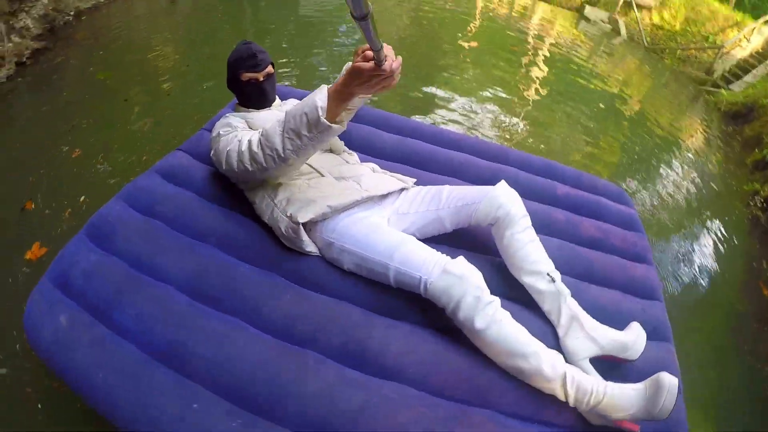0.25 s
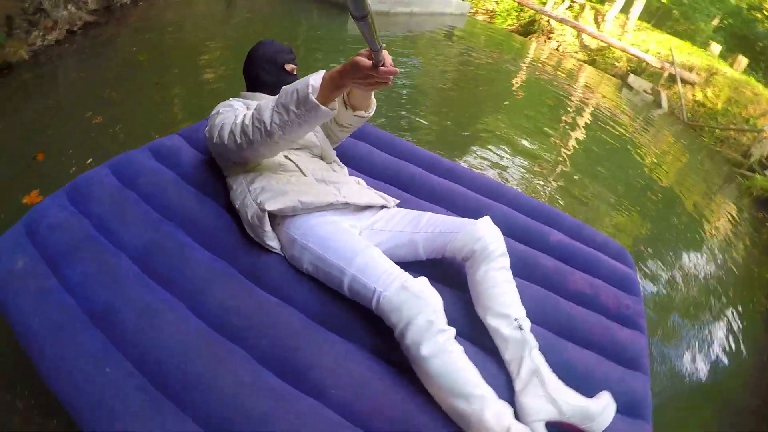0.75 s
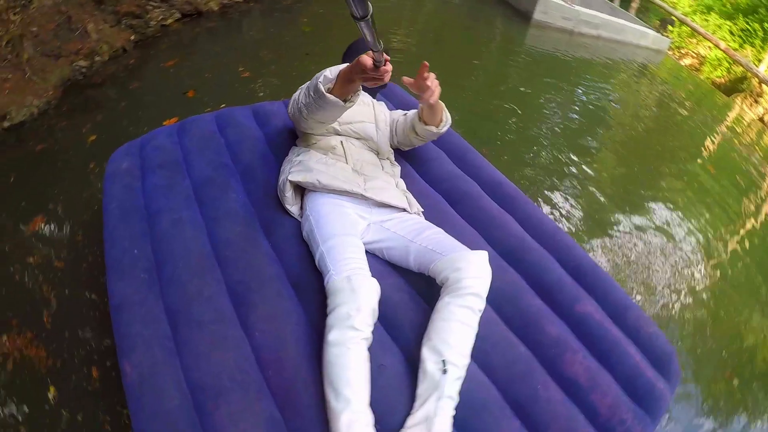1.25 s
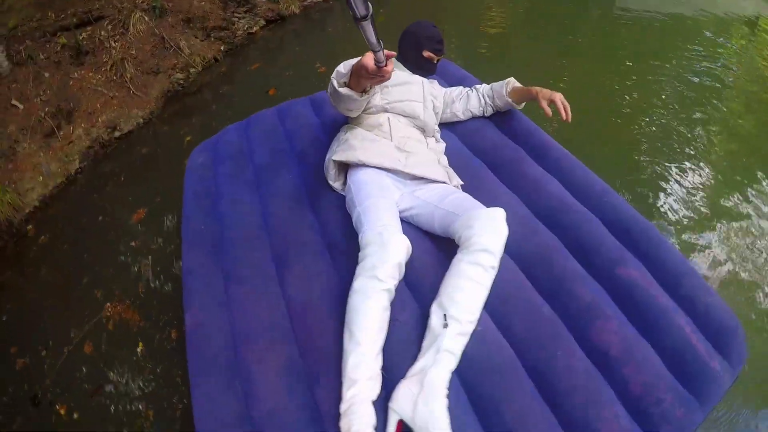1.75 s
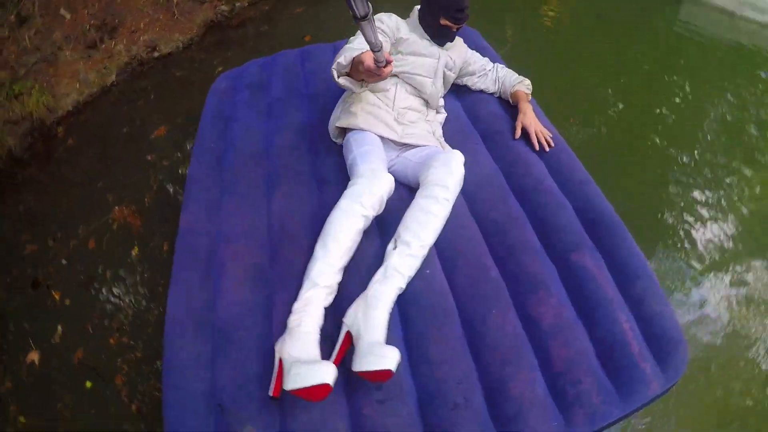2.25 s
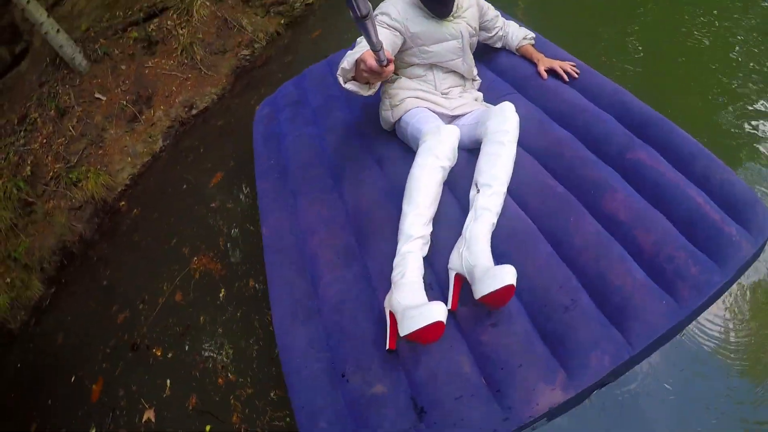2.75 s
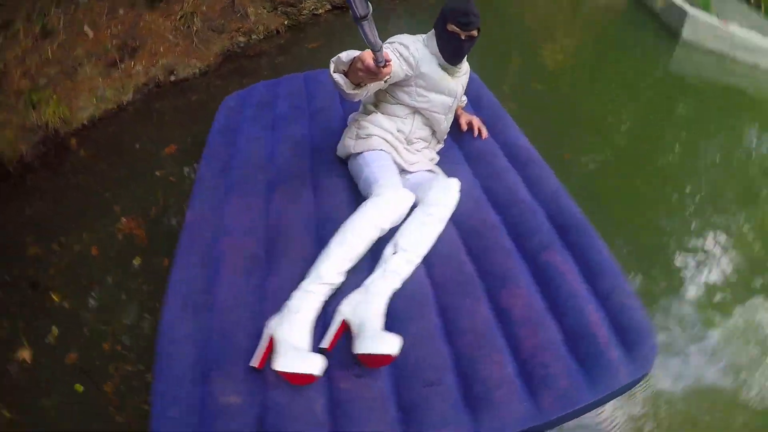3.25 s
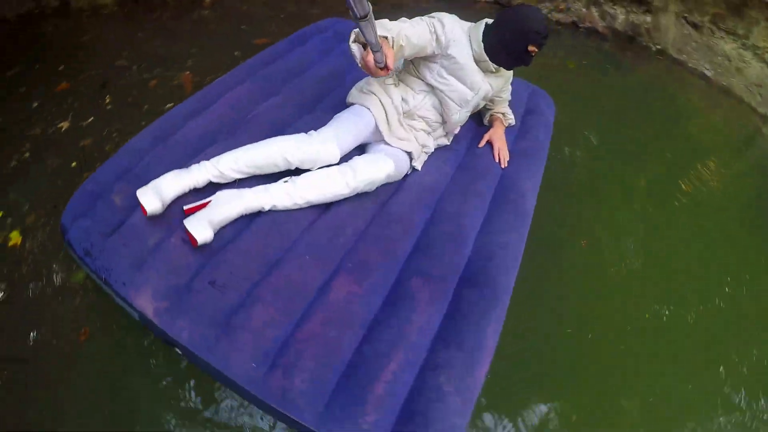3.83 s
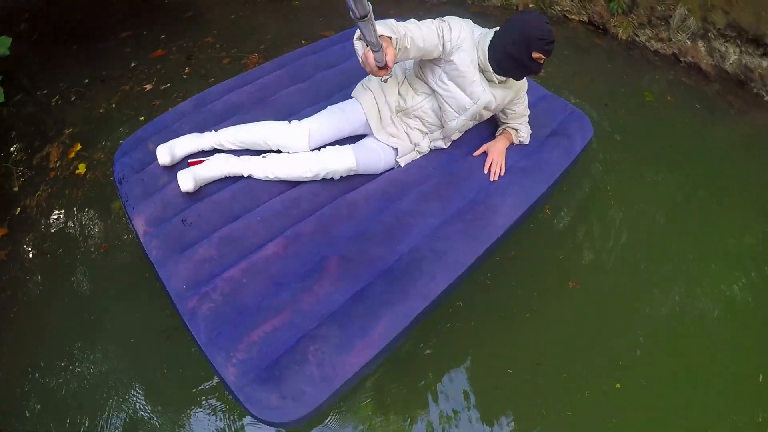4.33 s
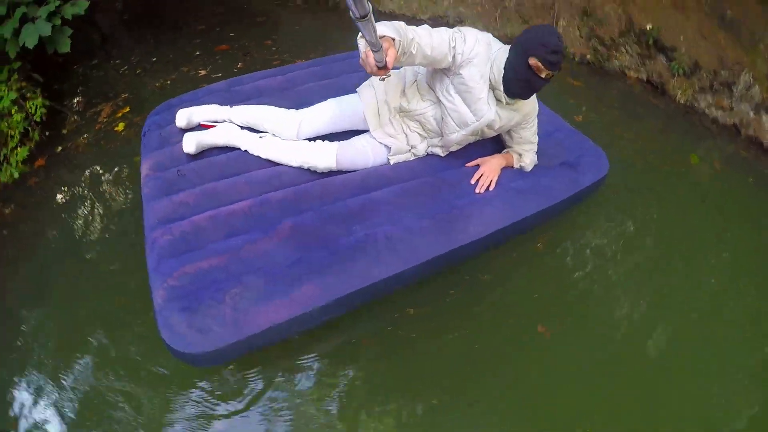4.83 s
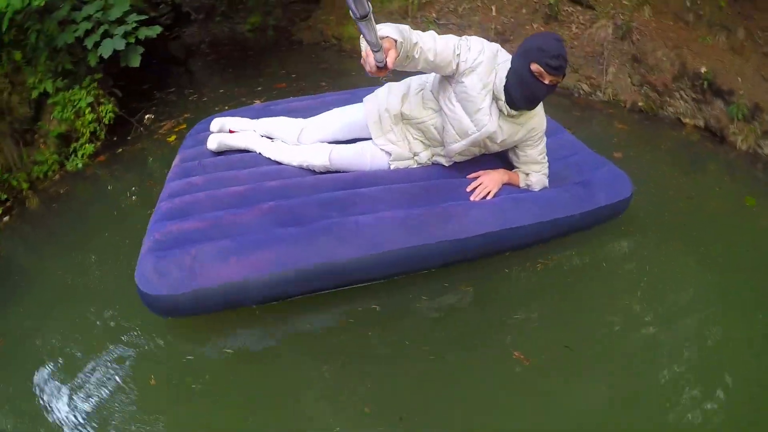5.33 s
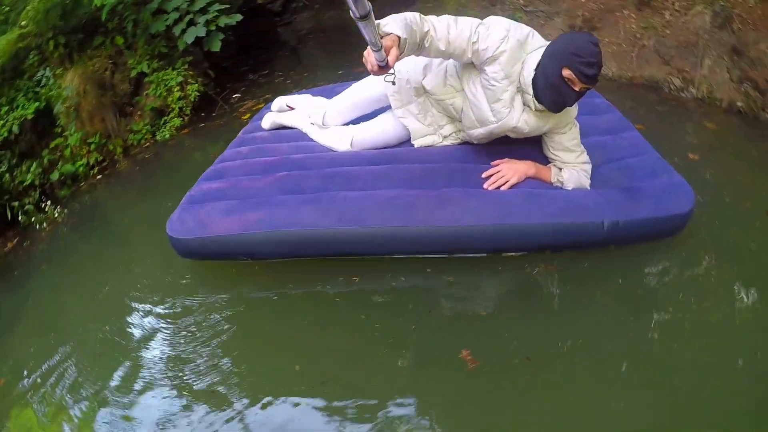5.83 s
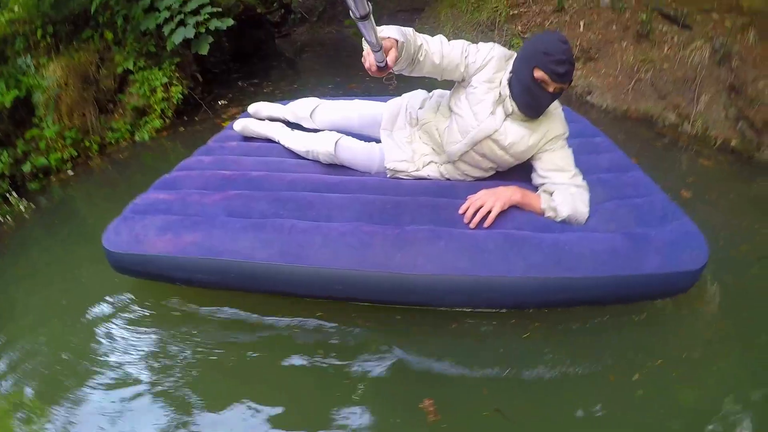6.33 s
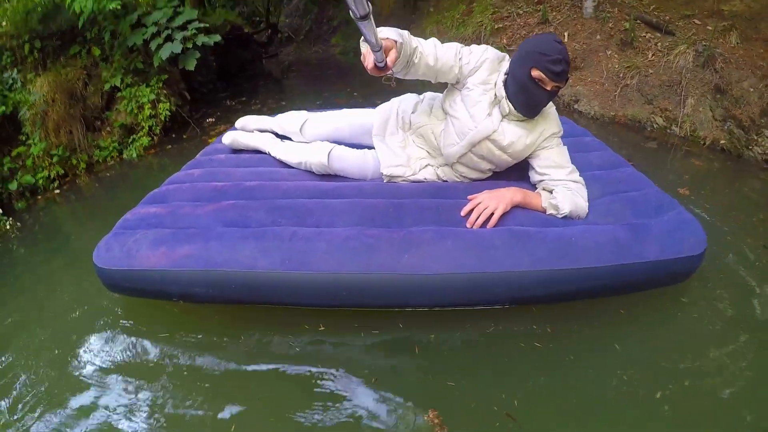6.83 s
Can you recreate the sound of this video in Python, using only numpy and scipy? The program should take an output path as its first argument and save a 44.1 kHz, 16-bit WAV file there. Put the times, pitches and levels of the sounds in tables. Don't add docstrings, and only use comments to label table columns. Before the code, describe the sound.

Close, dry, mono handling noise conducted through a pole into a sealed camera housing. From 0.1 to 0.4 s a rapid flurry of deep thumps, hollow tube knocks, sharp ticks and gritty skin rubs. A short lull with faint palm friction, small knocks at 0.6 and 0.7 s, then more rubbing and hard clicks from 0.8 to 1.2 s. Very heavy low thuds land around 1.6 s, with a snap at 1.75 and a softer bump near 2.0. Then mostly low unsteady rumble, muffled cloth rustle on vinyl and thin hiss, whose highest part slowly returns. Tiny water gulps blip at 2.7-3.3 s. At 3.3-3.75 s the strongest jolt cluster booms and clicks, with scuffs. Quieter rustling follows, a gulp at 4.3, moderate bumps at 4.75-5.2, then sparse thuds, ticks and small bubbles at 5.9-6.4 and a last hollow knock at 6.8, fading into rumble and rustle by 7 s.

```python
import sys
import numpy as np
from scipy import signal
from scipy.fft import rfft, irfft, next_fast_len
from scipy.io import wavfile
from scipy.ndimage import map_coordinates

SR = 44100
rng = np.random.default_rng(int(sys.argv[2]) if len(sys.argv) > 2 else 0)


def waveform_to_disk(signal):
    frames = np.transpose(np.atleast_2d(signal))
    scaled = np.clip(frames, -1, 1) * 32767
    samples = np.round(scaled).astype(np.int16)
    wavfile.write(sys.argv[1], SR, samples)


def nominal_scale(level):
    x = np.asarray(level, float) / 20
    return 10 ** x


N = 312228

# (peak time [s], level [dB], frequency [Hz], fall per 6 dB [ms])
HEAVES = [(.127, -10, 51.3, 24), (.17, -25, 53, 25), (.265, -14, 48.6, 27), (.349, -24, 59, 18),
          (.417, -15, 39.8, 13), (.915, -18.5, 37, 25), (1.081, -10.5, 44.6, 40), (1.187, -14, 44.7, 12),
          (1.606, -9.5, 47.3, 7), (1.648, -3.5, 36, 11), (1.977, -8, 43, 19), (2.478, -17.5, 40, 8),
          (3.385, -34, 47, 15), (3.579, -7, 48, 6), (3.647, -2, 34, 4), (3.75, -17.5, 42.3, 10),
          (4.904, -15.5, 57, 7), (4.957, -20, 42, 2), (5.197, -14.5, 53.5, 19), (5.916, -10.5, 42, 5),
          (6.254, -18.5, 45, 1), (6.495, -16.5, 45.5, 4)]
# (peak time [s], level [dB], frequency [Hz], fall per 6 dB [ms])
FIRST_BENDS = [(.07, -24.5, 136, 22), (.124, -12, 107, 12), (.194, -10.5, 132, 20), (.227, -7, 117, 2.5),
               (.252, -10.5, 112.2, 28), (.326, -6.5, 110.2, 15.5), (.385, -19, 106.5, 22.5),
               (.605, -17.5, 113.5, 4), (.733, -10.5, 134, 8), (.9, -19, 122, 7), (1.072, -17, 118, 12),
               (1.11, -20, 132, 9), (1.16, -11, 114, 10), (1.195, -13.5, 110, 12.5), (1.43, -29.5, 108, 24),
               (1.544, -25, 104, 21), (1.627, -7.5, 127, 5), (1.7, -20.5, 126, 30), (1.749, -11, 124, 2),
               (1.776, -10.5, 117, 11), (1.975, -19, 116, 19), (3.504, -25, 137, 6),
               (3.547, -13.5, 125, 10.5), (3.59, -15.5, 113, 16), (3.629, -9.5, 123, 13.5),
               (3.735, -17.5, 103, 6.5), (3.954, -22.5, 104.4, 22), (5.184, -12.5, 116, 6),
               (6.395, -19, 139.5, 18.5), (6.818, -13, 141.6, 17)]
# (peak time [s], level [dB], fall per 6 dB [ms])
TIGHT_BENDS = [
    (0.842, -27, 5),
    (3.427, -19, 5.5),
    (4.034, -23.5, 8),
    (4.767, -24, 16),
    (4.837, -20.5, 7.5),
    (4.875, -28, 24),
    (4.925, -21.5, 18.5),
    (6.08, -23.5, 5.5),
    (6.194, -27.5, 3),
]
# (peak time [s], level [dB], frequency [Hz], fall per 6 dB [ms])
SECOND_BENDS = [(.122, -10.5, 220, -2), (.191, -23.5, 202, 25), (.223, -24, 200, 8), (.732, -15, 190.5, 11),
                (.839, -25, 212, 20), (.894, -23, 211, 9), (.945, -31, 209, 9), (1.072, -16.5, 199, 14.5),
                (1.145, -15.5, 184, 5), (1.179, -21, 183, 8), (1.53, -24, 210, 1), (1.616, -13, 230, 4),
                (1.697, -24, 179, 21), (1.746, -8.5, 202, 2.5), (1.973, -22, 224, 12.5),
                (.6, -25.5, 240, -2.5), (3.287, -27.5, 276, 11), (3.43, -14.5, 189, 12.5),
                (3.492, -15, 223, 2), (3.625, -19.5, 193, -2), (3.719, -20.5, 221, 3), (3.942, -17, 190, 4),
                (4.756, -27.5, 199, 26), (4.832, -25.5, 201, 13), (4.903, -23, 213, 6),
                (4.954, -24.5, 206, 11), (6.398, -23, 189, 14), (6.807, -8, 205, 10)]
# (time [s], peak level [dB], tube share [dB], sleeve share [dB], clamp share [dB])
TICKS = [(0.091, -22.5, -3, -2, -33), (0.1162, -9.5, 5, -1, -33), (0.1686, -16, -12, -2, -29),
         (0.2191, -22.5, 8, 2, -21), (.292, -26, -15, -6, -16), (0.3139, -25, -14, 5.5, -14),
         (0.3649, -32.5, 8, 1, -8), (.594, -46, 1, 4, -20), (0.7229, -21.5, 4.5, 1.5, -28),
         (.836, -35, 0, 0, -24), (.8485, -27, -1, 0, -24), (1.067, -14.5, 1, -0.5, -22),
         (1.089, -27.5, -7, 0, 2), (1.1342, -18, -16, 0, -8), (1.1517, -16.5, -16, -2.5, -21),
         (1.175, -31, -16, 1, -12), (1.4217, -35, -5, -2, -21), (1.5197, -25.5, -4, -0.5, -15),
         (1.6084, -27, -18, 2, -11), (1.7409, -16.5, 5, -0.5, -26), (1.9613, -26, 5, 1.5, -16.5),
         (2.287, -31.5, -11, -2, -23), (3.291, -41.5, -5, 5, -10), (3.3214, -22.5, -5, 0.5, -8),
         (3.4477, -32.5, -6, -2, -13), (3.486, -27.5, -6, 0, -12), (3.51, -27.5, -2, -7, -16),
         (3.5376, -13.5, 1.2, -2, -13.5), (3.552, -31, -7, 1, -18), (3.5944, -30, -4, -2, -3),
         (3.716, -30, 0, -5, -5.5), (4.745, -30, 3, 1, -10), (4.8177, -28.5, -5, -4.5, -6.5),
         (5.1753, -33, 5, 1, -11), (5.878, -37, 0, -6, -17), (6.0611, -36, -7, 2, -12),
         (6.3837, -28, -15, -2.5, -17), (6.796, -27, 4, -0.5, -11), (6.8012, -24.5, -2, -6, -17)]
# (start [s], end [s], level [dB], brightness [dB], swell over the stroke [dB])
RUBS = [(0.068, 0.12, -48.5, -7, 5), (0.111, 0.16, -31, -11, -18), (0.169, 0.282, -33.5, -9.5, -6),
        (0.25, 0.302, -35.5, -1, 10), (0.299, .322, -28, 1, 3), (0.334, 0.366, -34.5, -6, 3),
        (0.59, .66, -51, -8, 3), (0.753, 0.817, -41.5, -12.5, -9), (0.829, 0.883, -32, -20, 8),
        (0.866, 0.929, -29, -20.5, 2), (0.926, 0.986, -29, -21, -1.5), (1.067, 1.129, -29.5, -14.5, 3),
        (1.127, 1.183, -31, -7.5, -5), (1.171, 1.209, -35.5, 0, 3.5), (1.406, 1.51, -50, -7, 2),
        (1.495, 1.606, -50.5, -4, 6), (1.599, 1.64, -39.5, -4.5, 2), (1.655, 1.708, -42.5, -7.5, 8),
        (1.722, 1.86, -54, -4.5, -8), (1.955, 2.03, -47, -7.5, -15), (0.428, 0.554, -56, 0.5, -4),
        (3.281, 3.305, -45, -13, 8), (4.045, 4.366, -57, -8, -10), (4.894, 4.965, -45.5, -10, -6),
        (6.042, 6.067, -41.5, -23, 8), (6.383, 6.467, -48, -7, 0)]
# (start [s], end [s], level [dB], brightness [dB])
SCUFFS = [(0.366, 0.388, -34.5, -9.5), (0.726, 0.742, -28.5, -13), (0.983, 1.02, -42, -14),
          (2.28, 2.314, -50, -10), (2.5, 2.545, -52, -12), (4.31, 4.328, -44, -20),
          (4.716, 4.725, -52, -14), (2.92, 2.944, -56, -22), (3.309, 3.34, -37.5, -16),
          (3.413, 3.452, -51, -1.5), (3.487, 3.517, -33.5, -21), (3.546, 3.581, -38.5, -7.5),
          (3.596, 3.602, -42.5, 4), (3.62, 3.64, -41, -0.5), (3.706, 3.736, -45, -1),
          (3.931, 3.961, -44, -7), (4.005, 4.048, -42, -14.5), (4.744, 4.77, -44, -16),
          (4.805, 4.837, -50, -27), (5.17, 5.194, -36, -28), (5.206, 5.239, -41.5, -32),
          (5.874, 5.897, -40.5, -15.5), (6.094, 6.123, -54, -4), (6.166, 6.228, -49, -9),
          (6.301, 6.318, -58, 3.5), (6.358, 6.365, -45, -15), (6.785, 6.848, -42, -30)]
# (centre [Hz], width [Hz], level [dB])
TUBE = [(257, 130, -3.5), (452, 50, -2), (583, 70, 0.5), (723, 144, -8.5), (828, 64, -11.5)]
# (centre [Hz], width [Hz], level [dB])
SLEEVE = [(1047, 55, 0), (1502, 157, 0), (1742, 134, 2), (1890, 115, 2), (2065, 135, -4.5),
          (2230, 105, -2.5), (2610, 530, -11)]
# (centre [Hz], width [Hz], level [dB])
CLAMP = [(2880, 47, -4.5), (3197, 62, -6), (3420, 160, -5), (3640, 79, 1), (3860, 79, 0.5),
         (4320, 160, -1.5), (4600, 104, -0.5), (4840, 90, -9)]
# (centre [Hz], width [Hz], level [dB])
JOINT = [(5040, 80, -8), (5530, 100, -6), (6090, 110, -8), (6120, 100, -6)]
# (centre [Hz], width [Hz], level [dB])
HOUSING = [(7330, 440, 3.5), (8010, 71, 7), (9500, 170, 5), (10600, 350, -13), (13400, 900, -20)]
# (centre [Hz], width [Hz], level [dB])
FINGER = [(1200, 990, -9), (2590, 1150, -13.5), (5300, 1200, -23)]
# (time [s], level [dB], centre [Hz])
CREEP = [
    (.38, -61, 4550),
    (.4, -52, 4550),
    (.57, -50.5, 4500),
    (.62, -57, 4450),
    (1.2, -48.5, 4600),
    (1.45, -54.5, 4360),
    (1.62, -57, 4500),
    (1.75, -53.5, 4100),
    (2.1, -58, 4050),
]
# (time [s], peak level [dB], start frequency [Hz])
BUBBLES = [(2.735, -40.5, 780), (2.928, -38, 400), (2.966, -48, 1150), (3.012, -40.5, 444),
           (4.311, -42, 1000), (5.217, -41, 1700), (2.871, -47, 1500), (3.279, -40, 1200),
           (3.487, -33, 1050), (3.21, -42, 960), (3.221, -40, 1250), (3.218, -48, 1800), (5.873, -36, 1250),
           (5.882, -38.5, 696), (5.884, -42, 1360), (6.06, -38, 930), (6.299, -42, 1300),
           (6.357, -43, 1500)]
# (time [s], rumble level [dB])
TENSION = [(0, -35.5), (.25, -24), (.47, -32.5), (1.05, -29.5), (2.46, -33), (3.21, -30.5), (3.53, -25.5),
           (3.81, -32.5), (7.08, -32.5)]
# (time [s], rustle level [dB])
STIR = [(0, -39.5), (.3, -54), (.47, -51), (1.05, -41), (1.16, -51), (1.9, -45.5), (2.55, -43.5),
        (3.0, -51), (3.25, -48), (3.5, -40.5), (3.75, -45.5), (4.25, -44), (4.65, -47.5), (5.05, -44),
        (5.3, -45), (5.75, -50.5), (6.23, -43.5), (7.08, -44.5)]
# (frequency [Hz], density [dB])
RUMBLE = [(8.8, -8.5), (15, 4), (38, -6), (52, -3.5), (70, -8), (102, -8), (189, -14.5), (230, -19.5),
          (300, -37), (510, -120)]
# (frequency [Hz], density [dB])
RUSTLE = [(140, -11.5), (230, 0.5), (339, -3.5), (415, -5.5), (561, -8.5), (618, -11), (1650, -18),
          (2500, -27), (3900, -63), (6600, -120)]
# (frequency [Hz], density [dB])
HISS = [(1470, -22), (2500, 3.5), (2680, 1.5), (3690, -1), (4010, -8), (4730, 1), (6000, -0.5), (8790, 4),
        (11500, -12.5), (15000, -28), (22000, -120)]
# (frequency [Hz], density [dB])
TOP_HISS = [(6180, -4), (10500, 0.5), (14200, -14), (15100, -13)]


def unit(x):
    return x / np.sqrt(np.mean(x ** 2) + 1e-20)


def curves(rows):
    time_s, *columns = np.transpose(rows)
    return [np.interp(np.arange(N) / SR, time_s, column) for column in columns]


def wobble(rate_hz):
    knots = rng.standard_normal(int(N * rate_hz / SR) + 4)
    return map_coordinates(knots, [np.arange(N) * rate_hz / SR])


def filtered(x, response):
    size = next_fast_len(N + SR // 2)
    return irfft(rfft(x, size) * response(np.fft.rfftfreq(size, 1 / SR)), size)[:N]


def coloured(spectrum):
    knot_hz, knot_db = np.transpose(spectrum)

    def colour(hz):
        return nominal_scale(np.interp(np.log(hz + 1), np.log(knot_hz + 1), knot_db))

    return unit(filtered(rng.standard_normal(N), colour))


def resonant(x, modes):
    low_hz, high_hz = 0.65 * modes[0][0], 0.89 * modes[-1][0]

    def response(hz):
        ring = 0
        for k, (centre, width, db) in enumerate(modes):
            damping = 1j * hz * width
            ring = ring + (-1) ** k * nominal_scale(db) * damping / (centre * centre - hz * hz + damping)
        high_pass = (1j * hz / low_hz) / (1 + 1j * hz / low_hz)
        return ring * high_pass / (1 + (1j * hz / high_hz) ** 2 + 1.3j * hz / high_hz)

    return filtered(x, response)


def swings(rows, gain_db):
    out = np.zeros(N + 2 * SR)
    t = np.arange(-SR // 2, SR // 2) / SR
    for peak_s, db, hz, fall_ms in rows:
        fall_ms = max(fall_ms, 4)
        rise_ms = 4.5 + .45 * fall_ms
        rise = (1000 * t / rise_ms) ** 2
        fall = np.abs(1000 * t / fall_ms) ** 0.97
        halvings = np.where(t < 0, rise, fall)
        carrier = np.cos(2 * np.pi * (hz * t + rng.random()))
        out[SR // 2 + round(peak_s * SR):][:SR] += nominal_scale(db + gain_db) * .5 ** halvings * carrier
    return out[SR:SR + N]


def pole():
    tight_hz = 134.4
    bends = FIRST_BENDS + [(s, db, tight_hz, fall_ms) for s, db, fall_ms in TIGHT_BENDS]
    return swings(HEAVES, gain_db=-2.5) + swings(bends, gain_db=1.97) + swings(SECOND_BENDS, gain_db=-3.0)


def ticks():
    lead_s, mean_t60_s = 0.0052, 0.0071
    dull, middle, bright = np.zeros((3, N + SR))
    t = np.arange(SR // 10) / SR
    push = np.exp(-((t - .0012) / .00006) ** 2)
    lead = t[:round(lead_s * SR)] / lead_s - 1
    for s, db, dull_db, middle_db, bright_db in TICKS:
        t60_s = mean_t60_s * np.exp(.15 * rng.standard_normal() - 0.28 * (db + 21.5))
        onset = (1 - np.exp(-t / (0.28 * t60_s))) ** 2
        decay = nominal_scale(-60 * t / np.clip(t60_s, .002, .1))
        chatter = onset * decay * rng.standard_normal(len(t))
        chatter_db = 6.5 - .35 * (db + 25)
        chatter *= nominal_scale(chatter_db) / np.linalg.norm(chatter)
        lead_in_db = -11 - 0.9 * (db + 19) + 10 * lead
        lead_in = nominal_scale(lead_in_db) * rng.standard_normal(len(lead)) / np.sqrt(len(lead) + 1)
        snap = np.append(lead_in, push)
        burst = nominal_scale(db) * (snap + np.append(0 * lead, chatter))
        at = slice(round(s * SR) - len(lead), round(s * SR) + len(t))
        dull[at] += nominal_scale(dull_db + 26.5) * (burst + nominal_scale(db) * snap) / 2
        middle[at] += nominal_scale(middle_db + 18.0) * burst
        bright[at] += nominal_scale(bright_db + 23.5) * burst
    dull, middle, bright = dull[:N], middle[:N], bright[:N]

    def damped(modes):
        return [(hz, 1.76 * width, db) for hz, width, db in modes]

    mount = resonant(bright, damped(CLAMP + JOINT))
    housing = nominal_scale(-21) * resonant(middle + bright, damped(HOUSING[:4]))
    contact = resonant(middle, FINGER)
    return resonant(dull, damped(TUBE)) + resonant(middle, damped(SLEEVE)) + mount + housing + contact


def rubbing():
    power = np.zeros((4, N))
    scuff_fade_db = -4.5
    for start, end, db, bright_db, swell_db in RUBS + [(*row, scuff_fade_db) for row in SCUFFS]:
        part_db = np.array([db, db - 0.5 + 0.53 * bright_db, db + bright_db, db - 8.5 - 0.33 * bright_db])
        near = slice(round(start * SR) - SR // 20, round(end * SR) + SR // 20)
        t = np.arange(near.start, near.stop) / SR
        contact = np.clip(np.minimum((t - start) / 0.015 + .5, (end - t) / 0.028 + .5), 0, 1)
        pressure = nominal_scale(swell_db * np.clip((t - start) / (end - start) - .5, -1, 1))
        power[:, near] += (contact * pressure * nominal_scale(part_db)[:, None]) ** 2
    tube, sleeve, clamp, grip = np.sqrt(power)
    shaken = nominal_scale(-19.5) * np.sqrt(tube * sleeve)
    fast = nominal_scale(-6.0) * clamp ** 2 / (clamp + 0.5 * tube + 1e-9)
    upper = nominal_scale(0.5) * sleeve * (clamp / (tube + 1e-9)) ** 0.25
    catch = .6 * wobble(90)
    parts = [(grip, TUBE[:2]), (tube, TUBE[2:]), (nominal_scale(-3) * sleeve, SLEEVE[:3]), (upper, SLEEVE[3:]),
             (clamp, CLAMP), (fast, JOINT), (shaken, HOUSING)]
    out = np.zeros(N)
    for level, modes in parts:
        grit = rng.standard_normal(N) * nominal_scale(3.2 * wobble(700) + catch)
        out += level * unit(resonant(grit, modes))
    return out


def creep():
    level_db, centre_hz = curves(CREEP)
    spread = unit(filtered(rng.standard_normal(N), lambda hz: 1 / (1 + (hz / 210) ** 2)))
    band = spread * np.cos(2 * np.pi * np.cumsum(centre_hz) / SR)
    carried = unit(resonant(rng.standard_normal(N), SLEEVE + CLAMP))
    return nominal_scale(level_db) * (nominal_scale(-1.5) * band + nominal_scale(-5.0) * carried)


def bubbles():
    life_cycles, rise_per_cycle = 4, .015
    out = np.zeros(N + SR)
    t = np.arange(SR // 10) / SR
    wander_rad = 1.5 * wobble(700)
    for s, db, hz in BUBBLES:
        first = round(s * SR)
        age = t * hz / life_cycles
        envelope = np.e * age * np.exp(-age ** 1.4)
        phase = 2 * np.pi * hz * t * (1 + rise_per_cycle * hz * t / 2) + wander_rad[first:][:len(t)]
        out[first:][:len(t)] += nominal_scale(db) * envelope * np.sin(phase)
    return out[:N]


def background():
    (rumble_db,), (rustle_db,) = curves(TENSION), curves(STIR)
    hiss_db = -54 + 0.083 * (rumble_db - rumble_db.mean())
    top_return_s = 1.92
    top_db = -56 - 23.5 * np.exp(-np.arange(N) / SR / top_return_s)
    tremor_db = 1.2 * wobble(7)
    rumble = nominal_scale(rumble_db + 1.5 + tremor_db + 1.85 * wobble(18)) * coloured(RUMBLE)
    rustle = nominal_scale(rustle_db + 1 + tremor_db + 0.78 * wobble(25) + 1.1 * wobble(2.973)) * coloured(RUSTLE)
    hiss = nominal_scale(hiss_db + 0.95 * wobble(5.7)) * coloured(HISS)
    top_hiss = nominal_scale(top_db + 1.6 * wobble(17)) * coloured(TOP_HISS)
    return rumble + rustle + hiss + top_hiss


def scene():
    return (pole() + ticks() + rubbing() + creep() + bubbles() + background())[None]


def band_limit(x):
    return signal.sosfilt(signal.butter(12, 15260, fs=SR, output="sos"), x)


def record(dry):
    ceiling, top_hz = .9, 15262
    squeezed = dry[0] / (1 + np.abs(dry[0] / ceiling) ** 8) ** (1 / 8)
    mix = filtered(squeezed, lambda hz: hz < top_hz)[None]
    return band_limit(mix)


dry = scene()
out = record(dry)
waveform_to_disk(out)
```